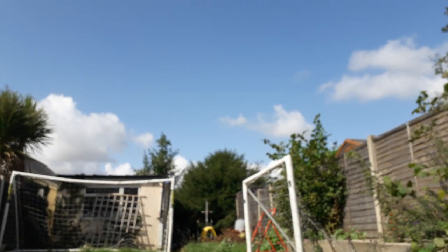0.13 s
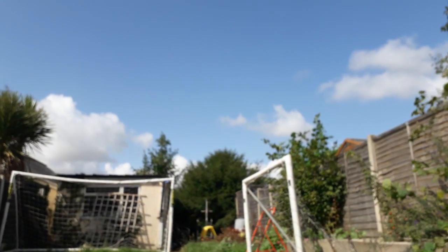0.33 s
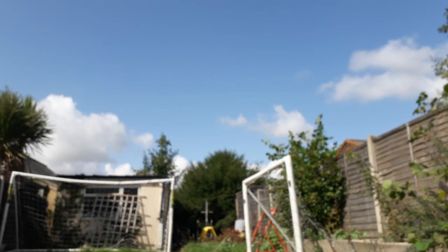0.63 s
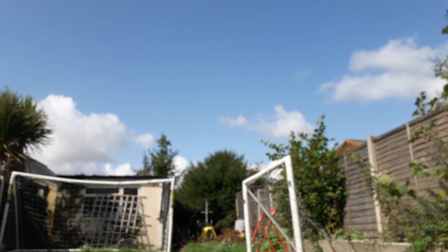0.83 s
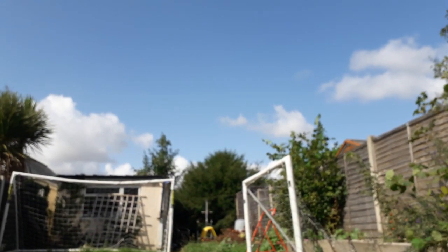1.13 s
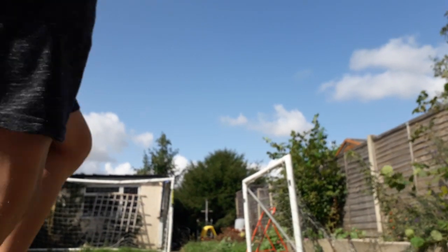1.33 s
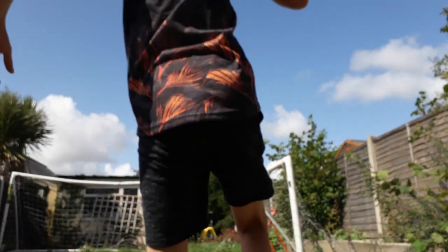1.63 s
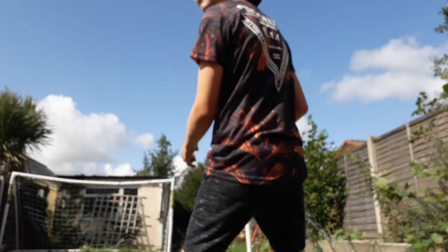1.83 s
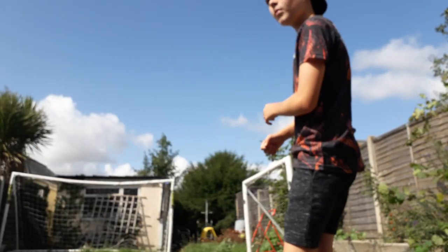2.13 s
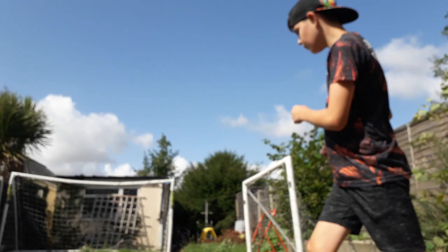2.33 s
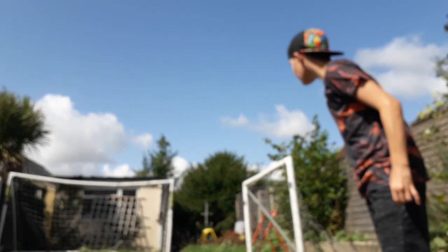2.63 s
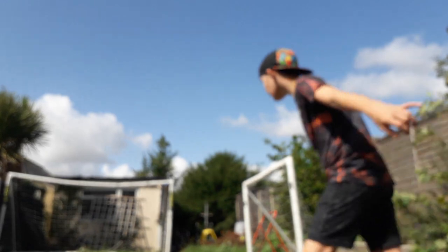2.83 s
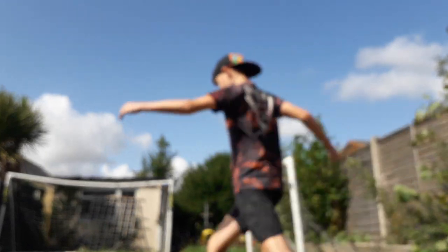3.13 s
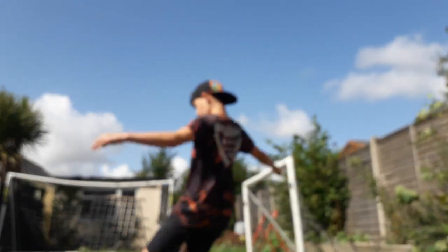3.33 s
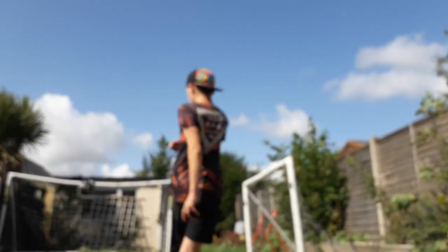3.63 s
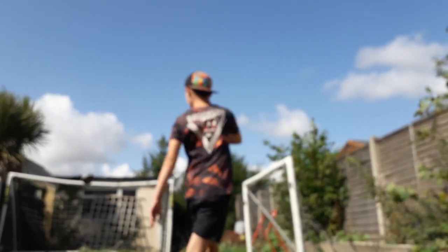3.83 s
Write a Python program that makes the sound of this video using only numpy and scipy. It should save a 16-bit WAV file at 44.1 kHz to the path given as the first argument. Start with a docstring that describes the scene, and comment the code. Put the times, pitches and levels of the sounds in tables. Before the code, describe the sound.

A football is kicked hard with a boomy smack after footsteps and knocks in a garden

```python
"""Kicking a football in a garden

A player steps past the microphone in a fenced garden, runs up over the grass and kicks a football.
Shoes and ball are damped tones with grit, the kicked ball and a hollow object are sums of ringing modes.
Scuffs are grainy swells of noise, and some small metal thing chinks with a few high modes.
Air buffets the microphone as rumble and short low swings; leaves hiss behind as coloured noise.
Knocks, thuds and hollow blows, and the boot's contacts, bring back a short garden echo of decaying noise."""
import sys
import numpy as np
from scipy import signal
from scipy.fft import rfft, irfft, next_fast_len
from scipy.io import wavfile
from scipy.ndimage import map_coordinates

SR = 44100
rng = np.random.default_rng(int(sys.argv[2]) if len(sys.argv) > 2 else 0)


def to_wav(s):
    """Save 16-bit WAV."""
    ch = np.atleast_2d(s).T  # columns
    pcm = np.round(np.clip(ch, -1, 1) * 32767)  # PCM
    wavfile.write(sys.argv[1], SR, pcm.astype(np.int16))


N = 176400  # 4 s


def kick():
    """The boot smacks the ball, whose skin and air boom on; a dull contact follows."""
    # modes of the kicked ball: pitch_hz, level_db, t60_s
    ball_modes = [(85, -5.5, 0.095), (151.2, -10.5, 0.15), (225.3, -14.5, 0.195), (281, -19, 0.14),
                  (690, -31, 0.17), (939, -22.5, 0.14), (1070, -27, 0.071), (2180, -20.5, 0.057)]
    # spectrum of the slap: frequency_hz, level_db
    slap_spectrum = [(100, 1), (500, 0), (2200, -3.5), (4000, -2), (5200, -12.5), (11000, -13.5),
                     (16000, -20)]
    kick_s, second_s = 3.4326, 3.4475
    t = ticks()
    smack = ring(hz=782, t60=0.013)
    slap = amp(-10) * noise(slap_spectrum, len(t)) * fade(t, t60=0.015)
    boom = resound(ball_modes, rise_s=0.0016)
    second = amp(-7) * contact(hz=440, cycles=4.9)

    out = np.zeros(N)
    add(out, kick_s, garden(smack + slap, echo_db=-9) + boom)
    add(out, second_s, garden(second, echo_db=-7.5))
    return out


def footwork():
    """Hard knocks and soft thuds of shoes and ball: damped tones, each with its garden echo."""
    # knocks: start_s, level_db, pitch_hz, ring_cycles (to -60 dB), echo_db
    knocks = [(0.23, -36.5, 775, 3, -1), (.316, -29.5, 700, 6.5, -0.5), (.343, -24, 590, 3.5, -2),
              (0.3533, -25, 646, 4, -2), (.571, -36, 537, 5, 1.5), (.662, -35.5, 636, 4.5, 2),
              (.712, -32.5, 706, 12, 1), (.759, -28, 1150, 1.5, 0), (.772, -26, 670, 6.5, -2),
              (1.0814, -12.5, 650, 3, -3), (1.0894, -15, 370, 4.5, -3.5), (1.122, -22.5, 260, 7, -7),
              (1.6487, -2, 1110, 1.5, -8), (1.6525, -5.5, 1520, 2, -9.5), (1.675, -26, 1100, 1.5, -5),
              (1.691, -11.5, 387, 1.5, -9), (1.8006, -16.5, 930, 4, -5.5), (1.842, -27.5, 900, 1, -11),
              (1.893, -24, 590, 4, -9), (2.9057, -7, 1165, 14, -11.5), (2.907, -2.5, 2310, 7.5, -11),
              (2.914, -11, 2460, 3, -4), (3.2545, -16, 437, 4, -6.5), (3.2766, -14.5, 990, 2, -4),
              (3.2817, -12.5, 1390, 4, -5.5), (3.2858, -15.5, 1170, 2.5, -5), (3.289, -15, 1280, 2.5, -7),
              (3.519, -16, 3120, 2.5, -6.5), (3.637, -31.5, 526, 4, 1), (3.7304, -17, 1350, 2.5, -2),
              (3.7338, -19.5, 786, 2, -1), (3.756, -21.5, 483, 3.5, -7.5), (3.7698, -21.5, 800, 1, -7),
              (3.897, -33, 364, 3.5, 3), (3.99, -21.5, 1120, 3.5, -2)]
    # soft thuds on the lawn: start_s, level_db, pitch_hz, t60_s
    thuds = [(.574, -35.5, 133, 0.21), (.663, -15, 176, 0.053), (.678, -28, 226, 0.1), (1.14, -25, 207, .1),
             (1.681, -24.5, 149, 0.093), (2.916, -20, 100, 0.068), (3.517, -24.5, 134.6, 0.11),
             (3.643, -27, 139, 0.06)]
    thud_rise_s = 0.0021
    out = np.zeros(N)
    for start_s, level_db, hz, cycles, echo_db in knocks:
        knock = contact(hz, cycles)
        add(out, start_s, amp(level_db) * garden(knock, echo_db))
    for start_s, level_db, hz, t60 in thuds:
        thud = ring(hz, t60) * swell(thud_rise_s)
        add(out, start_s, amp(level_db) * garden(thud, echo_db=-6))
    return out


def contact(hz, cycles):
    """A heavily damped knock of peak 1, dull and short of bass, with a brief gritty crunch under it."""
    # spectrum of the crunch: frequency_hz, level_db
    grit_spectrum = [(300, -14), (900, -1.5), (2000, 1), (2500, -5), (3200, -10.5), (4300, -8),
                     (5500, -22.5), (7500, -52), (16000, -60)]
    knock = dull(ring(hz, cycles / hz), 3370)
    knock = cut_bass(knock, 0.17 * hz, order=1)
    crunch = amp(-21.5) * grainy(grit_spectrum, len(knock)) * fade(ticks(), t60=0.035)
    return knock / np.abs(knock).max() + crunch


def bump():
    """A hollow object answers each blow with the same few low modes."""
    # blows: start_s, level_db
    blows = [(.316, -21), (.343, -16.5), (.712, -16), (.765, -17.5), (1.0818, -2)]
    # modes of the hollow object: pitch_hz, level_db, t60_s
    hollow_modes = [(198, -25.5, 0.26), (237, -13.5, 0.098), (295.3, -21, 0.14), (451.7, -18, .17),
                    (721, -27, 0.15), (980, -29, 0.052), (1490, -27, 0.038)]
    out = np.zeros(N)
    for start_s, level_db in blows:
        blow = resound(hollow_modes, rise_s=0.0019)
        add(out, start_s, amp(level_db) * garden(blow, echo_db=-12))
    return out


def resound(modes, rise_s):
    """A hollow body swells into its ringing modes, balanced a little differently at each blow."""
    body = sum(amp(db + rng.normal()) * ring(hz, t60) for hz, db, t60 in modes)
    return -body * swell(rise_s)


def scuffs():
    """Blades of grass brush a shoe: a grainy swell that dies quickly."""
    # brushes through the grass: peak_s, level_db, rise_s, t60_s, tilt_db_per_octave
    brushes = [(.181, -51, 0.0018, 0.069, -1), (0.351, -44, 0.017, 0.083, -2.5),
               (.765, -43.5, 0.043, 0.11, -2.5), (.9, -49, 0.038, 0.083, -1), (1.184, -53, 0.047, .1, 4),
               (1.382, -42, 0.0051, 0.075, -5), (1.688, -40, 0.019, 0.087, -3.5),
               (1.935, -40, 0.033, 0.059, -3.5), (2.155, -45.5, .01, 0.2, -1.5),
               (2.29, -36, 0.0059, 0.12, -0.5), (2.335, -38, 0.00084, 0.13, -4.5),
               (2.44, -39, 0.0087, 0.069, -6), (2.618, -34.5, 0.004, 0.16, -2.5),
               (2.646, -35, .003, 0.099, -4.5), (2.845, -41, 0.0028, 0.07, -4),
               (2.911, -26, 0.0035, 0.06, -1), (3.115, -45, .015, 0.095, -2),
               (3.19, -43.5, 0.018, 0.16, -1), (3.441, -28, 0.011, 0.16, -0.5),
               (3.474, -38.5, 0.013, 0.14, 3), (3.52, -42, 0.0022, 0.15, 0), (3.888, -46, 0.009, 0.1, -1)]
    # spectrum of the brushed grass before the tilt: frequency_hz, level_db
    grass_spectrum = [(200, -23), (700, -1), (2300, 1), (4500, -1.5), (7500, -10), (10500, -4),
                      (13000, -10), (16000, -25)]
    out = np.zeros(N)
    t = ticks() - 1 / 8  # the peak stands at zero
    for peak_s, level_db, rise_s, t60, tilt_db in brushes:
        rise = np.exp(np.minimum(t, 0) / rise_s)
        fall = fade(np.maximum(t, 0), t60)
        brush = rise * fall * grainy(grass_spectrum, len(t), tilt_db)
        add(out, peak_s + t[0], amp(level_db) * brush)
    return out


def grainy(spectrum, size, tilt_db=0):
    """Noise broken into clumps of tiny grains by a fast random level."""
    clumps = amp(3.5 * wobble(700, size))
    return unit(noise(spectrum, size, tilt_db) * clumps)


def chinks():
    """A tiny piece of metal ticks and rings, each time with another balance of its modes."""
    # chinks: start_s, level_db, tilt_db
    strikes = [(0.481, -39.5, -4), (.657, -37.5, 6), (.968, -51, 5), (1.43, -35.5, -9), (1.713, -37.5, 4.5),
               (1.893, -25.5, -21), (2.092, -32.5, -9), (2.296, -36.5, -10), (2.374, -44.5, -4),
               (2.607, -33.5, 4.5), (2.806, -44.5, -3)]
    # modes of the metal: pitch_hz, level_db (before tilt), t60_s, share_of_tilt (ratio)
    metal_modes = [(10460, -2.5, 0.16, 0), (11960, -3, 0.16, 1), (12170, -10, 0.21, 0.49),
                   (15260, -14, 0.15, 0.074)]
    # spectrum of the tick: frequency_hz, level_db
    tick_spectrum = [(6000, -45), (9500, -7), (10500, 0), (11300, -5), (12100, -6), (13500, -15),
                     (15300, -10), (16000, -20)]
    rise_s, roughness = 0.0018, 0.46
    out, t = np.zeros(N), ticks()
    for start_s, level_db, tilt_db in strikes:
        chink = amp(-10) * noise(tick_spectrum, len(t)) * fade(t, t60=0.07)
        for hz, mode_db, t60, share in metal_modes:
            unsteady = 1 + roughness * wobble(164, len(t))
            chink += amp(mode_db + share * tilt_db) * ring(hz, t60) * unsteady
        add(out, start_s, amp(level_db) * chink * swell(rise_s))
    return out


def puffs():
    """Eddies push the diaphragm to and fro for a cycle or two; the quicker ones flutter more."""
    # puffs that strike the microphone: peak_s, level_db, pitch_hz
    eddies = [(1.765, -28, 126), (1.911, -29.5, 173), (1.926, -22.5, 122), (2.041, -19, 91.5),
              (2.084, -21.5, 169), (2.16, -22, 188), (2.195, -15, 201), (2.215, -18, 134),
              (2.26, -21.5, 138), (2.297, -15.5, 189), (2.35, -10, 172), (2.37, -18, 95), (2.398, -19, 238),
              (2.485, -17.5, 105), (2.511, -18.5, 258), (2.54, -11.5, 250), (2.551, -9, 142.5),
              (2.612, -14, 230), (2.625, -12.5, 323), (2.639, -9.5, 171), (2.658, -12, 240),
              (2.685, -9.5, 207), (2.699, -16, 255), (2.725, -27, 300), (2.796, -20, 127),
              (2.886, -17.5, 134), (2.99, -22.5, 139)]
    # spectrum of the flutter: frequency_hz, level_db
    flutter_spectrum = [(200, -1.5), (330, 1.5), (550, -8.5), (800, -19.5), (1500, -36), (4000, -66)]
    decay_cycles = 0.75  # to 1/e, on either side of the peak
    octave_share = 0.22  # strength of the octave above, which skews the swing
    flutter_db, flutter_growth = -16, 1.56  # level at the mean pitch; power law of pitch
    out = np.zeros(N)
    t = ticks() - 1 / 8  # the peak stands at zero
    mean_hz = np.mean([hz for _, _, hz in eddies])
    for peak_s, level_db, hz in eddies:
        phase = 2 * np.pi * hz * t
        octave = np.sin(2 * phase + rng.uniform(0, 2 * np.pi))
        swing = np.sin(phase) + octave_share * octave
        flutter_gain = amp(flutter_db) * (hz / mean_hz) ** flutter_growth
        flutter = flutter_gain * noise(flutter_spectrum, len(t))
        envelope = np.exp(-np.abs(hz * t) / decay_cycles)
        add(out, peak_s + t[0], amp(level_db) * (swing + flutter) * envelope)
    return out


def wind():
    """Moving air on the microphone: low noise whose level is lumpy."""
    # strength of the moving air: time_s, level_db
    air_level = [(0, -65), (.12, -71.5), (.3, -52), (.55, -52.5), (.78, -45.5), (.88, -42.5), (1.03, -58.5),
                 (1.2, -50.5), (1.45, -43), (1.6, -53.5), (1.85, -44), (2.0, -40), (2.05, -31),
                 (2.3, -27.5), (2.43, -33), (2.53, -24), (2.68, -24), (2.74, -34), (2.95, -34.5),
                 (3.15, -46), (3.38, -56), (3.55, -41), (3.8, -56.5), (4, -48)]
    # spectrum of the rumble: frequency_hz, level_db
    rumble_spectrum = [(20, -30), (40, -9), (65, 0.5), (110, 1), (190, -3.5), (300, -15.5), (500, -34.5),
                       (1500, -68)]
    lumps = amp(2.5 * wobble(29.95))
    return amp(curve(air_level)) * unit(noise(rumble_spectrum) * lumps)


def leaves():
    """The soft hiss of the garden: coloured noise, thinned in the bass, that sways slightly in level."""
    # spectrum of the hiss before the bass is thinned: frequency_hz, level_db
    leaf_spectrum = [(100, 3.5), (250, -0.5), (450, -7.5), (1000, -13.5), (2500, -15.5), (4300, -15),
                     (6000, -19), (8000, -25), (9700, -17), (12000, -21), (16000, -29)]
    # level of the hiss before the sway: time_s, level_db
    hiss_level = [(0, -60), (.13, -68.5), (.3, -54), (.55, -54), (.85, -52.5), (1.3, -49), (2, -50),
                  (2.7, -48.5), (3.2, -48.5), (3.55, -50), (3.8, -53), (4, -53)]
    low_hz = 120
    hiss = filtered(noise(leaf_spectrum), lambda hz: hz ** 2 / (hz ** 2 + low_hz ** 2))
    sway_db = 0.54 * wobble(8.3)
    return unit(hiss) * amp(curve(hiss_level) + sway_db)


def garden(x, echo_db):
    """A sound with quick scatter from ground and fence, and a fainter longer tail."""
    # decay of the longer tail: frequency_hz, t60_s
    tail_decay = [(100, .28), (500, 0.3), (1400, 0.23), (2400, .25), (10000, 0.099)]
    near_t60, far_db, delay_s = 0.041, -7.5, 0.00198
    t = ticks()
    # the longer tail decays at its own rate in each frequency band
    hz, frame_s, bands = signal.stft(rng.standard_normal(len(t)), SR, nperseg=256)
    bands = bands * fade(frame_s, along(tail_decay, hz)[:, None])
    far = signal.istft(bands, SR, nperseg=256)[1][:len(t)]
    near = rng.standard_normal(len(t)) * fade(t, near_t60)
    echo = (unit(near) + amp(far_db) * unit(far)) * (t > delay_s)
    echo = unit(echo) / np.sqrt(len(t))  # total energy 1
    return x + amp(echo_db) * signal.fftconvolve(x, echo)[:len(t)]


def ring(hz, t60):
    """One damped mode: a sine that dies away exponentially."""
    return -np.sin(2 * np.pi * hz * ticks()) * fade(ticks(), t60)


def fade(t, t60):
    """Exponential decay that falls 60 dB in t60 seconds."""
    return amp(-60 * t / t60)


def swell(rise_s):
    """Exponential approach from silence to full level."""
    return 1 - np.exp(-ticks() / rise_s)


def noise(spectrum, size=N, tilt_db=0):
    """Coloured noise of rms 1, tilted by tilt_db per octave."""
    def colour(hz):
        return amp(along(spectrum, hz) + tilt_db * np.log2(hz + 1))
    return unit(filtered(rng.standard_normal(size), colour))


def filtered(x, response):
    """x times a response of frequency, padded so that its end does not wrap round."""
    size = next_fast_len(len(x) + 8192)
    hz = np.fft.rfftfreq(size, 1 / SR)
    return irfft(rfft(x, size) * response(hz), size)[:len(x)]


def dull(x, hz):
    """Causal low-pass."""
    return signal.lfilter(*signal.butter(2, min(hz, SR / 2 - 1), fs=SR), x)


def cut_bass(x, hz, order):
    """Causal high-pass."""
    return signal.lfilter(*signal.butter(order, hz, "high", fs=SR), x)


def wobble(rate, size=N):
    """A smooth random curve, rate knots a second."""
    knots = rng.standard_normal(size // 20)
    return map_coordinates(knots, [np.arange(size) * rate / SR], mode="wrap")


def curve(rows):
    """One value per sample from (s, value) rows."""
    return np.interp(np.arange(N) / SR, *np.transpose(rows))


def along(points, hz):
    """(Hz, value) points read on a log frequency axis."""
    f, v = np.transpose(points)
    return np.interp(np.log(hz + 1), np.log(f + 1), v)


def amp(db):
    """Decibels to gain."""
    return 10 ** (np.asarray(db) / 20)


def unit(x):
    """Scale to rms 1."""
    return x / np.sqrt(np.mean(x ** 2) + 1e-20)


def ticks():
    """Half a second of sample times."""
    return np.arange(SR // 2) / SR


def add(track, s, x):
    """Mix x into the track at time s."""
    part = track[max(round(s * SR), 0):][:len(x)]
    part += x[:len(part)]


def scene():
    """Everything at one microphone."""
    player = kick() + footwork() + bump() + scuffs() + chinks()
    air = puffs() + wind() + leaves()
    return (player + air)[None]


def record(dry):
    """The recorder drops the deepest bass, rounds off the highest peaks and keeps nothing above its band."""
    x = cut_bass(dry[0], 53.6, order=3)
    rounded = x / (1 + x ** 8) ** (1 / 8)  # never beyond full scale
    return filtered(rounded, lambda hz: hz < 16000)[None]


dry = scene()
out = record(dry)
to_wav(out)
```